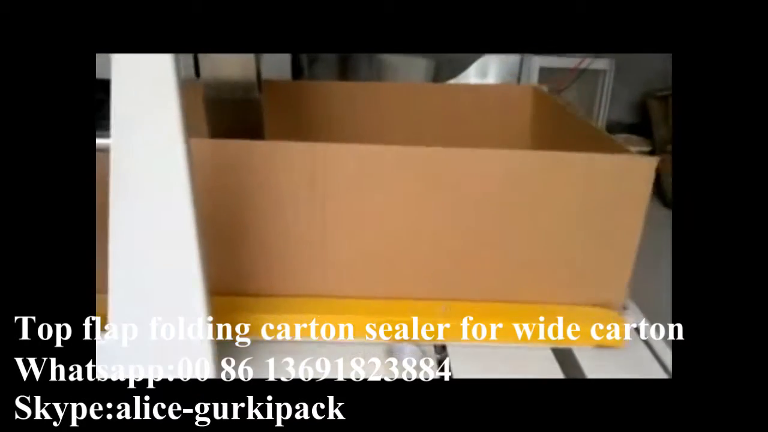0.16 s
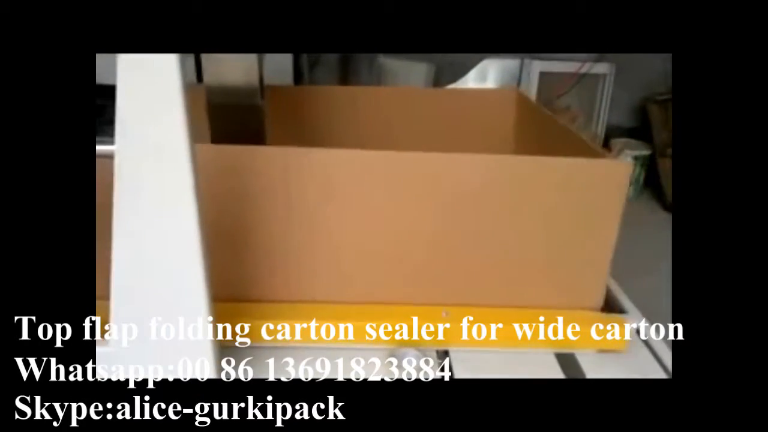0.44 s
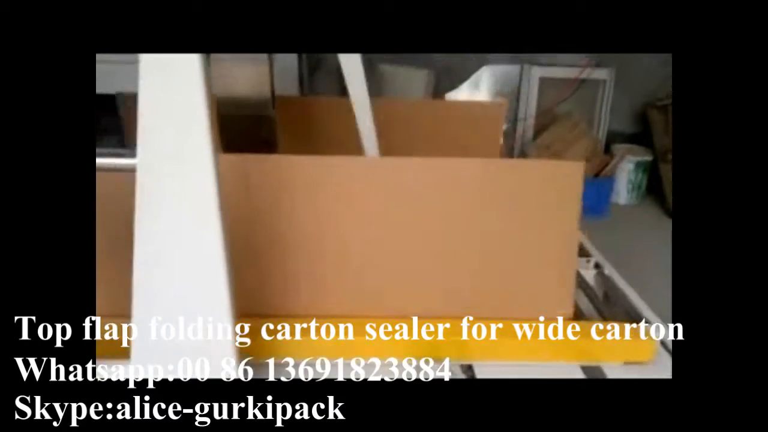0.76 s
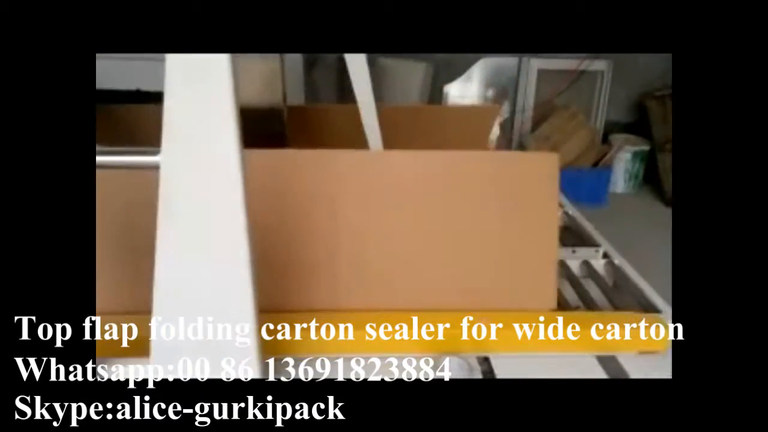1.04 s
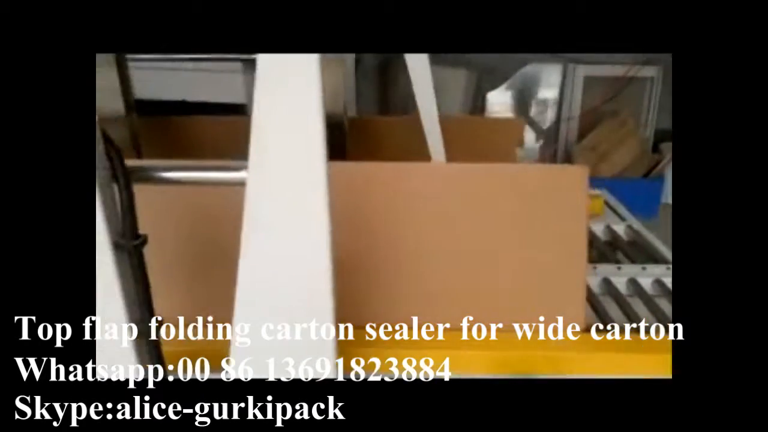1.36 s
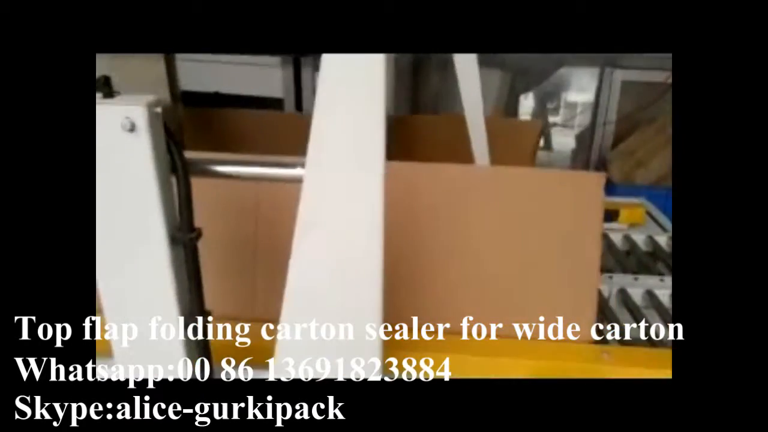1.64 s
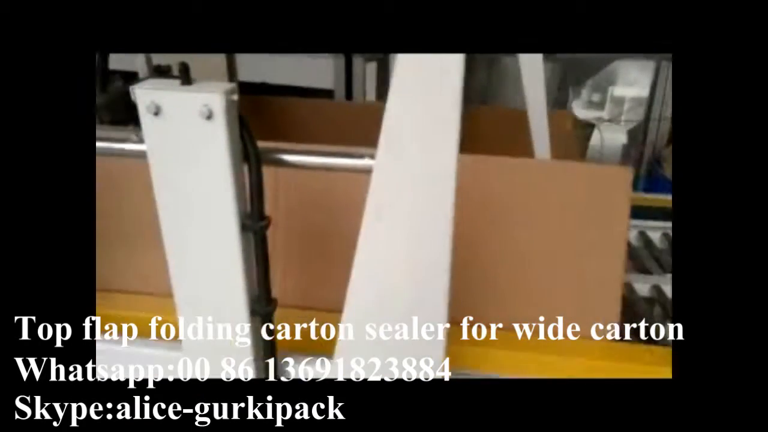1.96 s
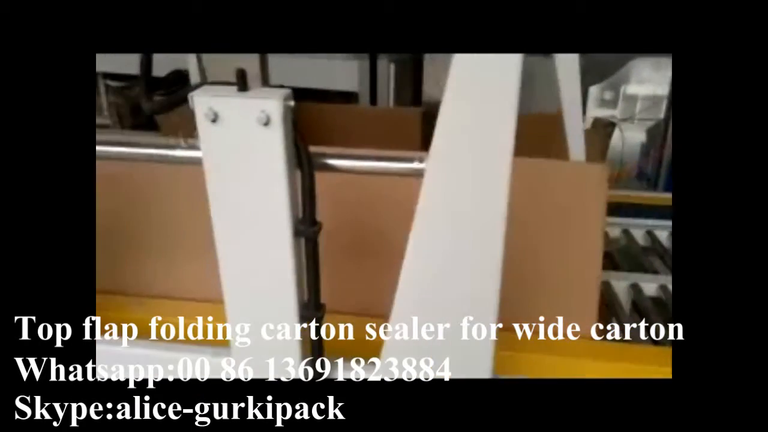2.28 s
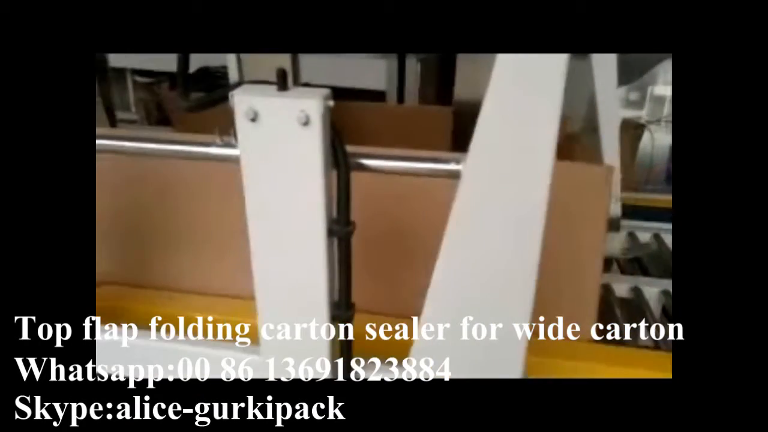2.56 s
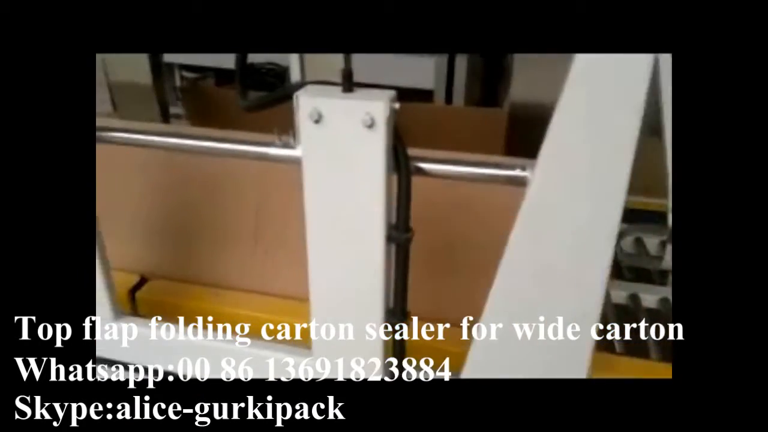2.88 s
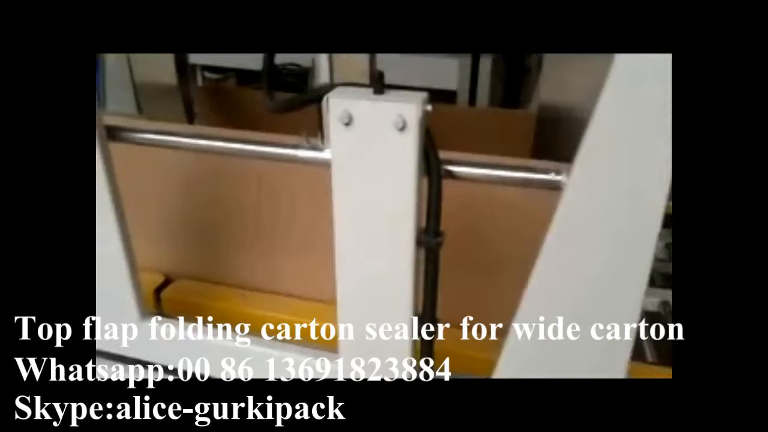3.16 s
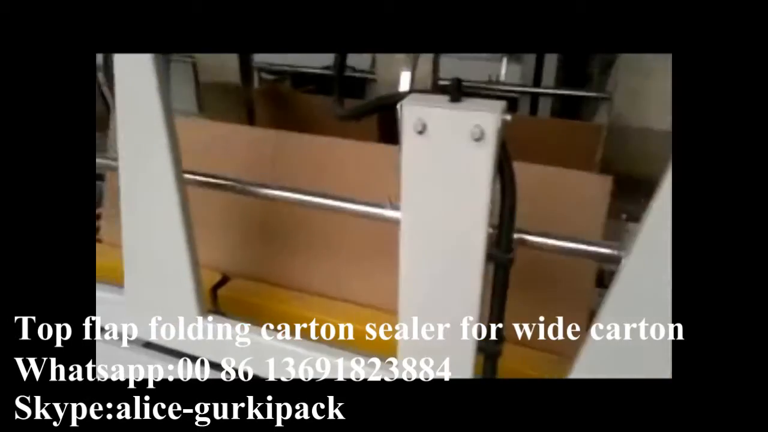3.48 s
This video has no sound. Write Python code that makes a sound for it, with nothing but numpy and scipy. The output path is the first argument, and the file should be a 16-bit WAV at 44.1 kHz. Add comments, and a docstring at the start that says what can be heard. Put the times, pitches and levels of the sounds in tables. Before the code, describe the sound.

Carton sealer and roller conveyor drone while a box is knocked, air hisses and metal clanks

```python
"""Carton sealing machine

The machine and its roller conveyor rumble in a factory hall: coloured noise with unsteady gear tones.
A folding arm booms into the carton, whose resonances ring from noise and knocks. Compressed air hisses as
shaped noise, a flap scrapes along a guide as dense grains, and small clanks follow as decaying noise bands;
a carton side rubs on a belt. Moving air puffs as short low waves on the two ports of a hand-held microphone
whose cheap resampler mirrors the treble."""
import sys
import numpy as np
from scipy import signal
from scipy.fft import rfft, irfft, next_fast_len
from scipy.io import wavfile
from scipy.ndimage import uniform_filter1d, map_coordinates

SR = 44100
rng = np.random.default_rng(int(sys.argv[2]) if len(sys.argv) > 2 else 0)


def rack_gain(trim_db):
    """Turn a fader trim in dB into the linear factor to multiply a signal by."""
    fader = np.asarray(trim_db, float)
    return 10 ** (fader / 20)


def int16_out(signal):
    """Quantize to a 16-bit WAV file."""
    q = np.round(np.clip(np.atleast_2d(signal).T, -1, 1) * 32767)
    wavfile.write(sys.argv[1], SR, q.astype(np.int16))


N = 159642  # length in samples


def unit(x):
    """Scaled to rms 1."""
    return x / np.sqrt(np.mean(x ** 2) + 1e-20)


def along(points, hz):
    """Reads a curve of (Hz, value) points on a log frequency axis."""
    point_hz, value = np.transpose(points)
    return np.interp(np.log(hz + 1), np.log(point_hz + 1), value)


def curves(rows):
    """One value per sample for each column after the time."""
    s, *columns = np.transpose(rows)
    return [np.interp(np.arange(N) / SR, s, column) for column in columns]


def burst(rows):
    """Gains of a level curve and its relative second layer, faded down to near silence outside the span."""
    fade_in = (rows[0][0] - 0.02, -90, 0)
    fade_out = (rows[-1][0] + 0.045, -70, 0)
    level_db, over_db = curves([fade_in, *rows, fade_out])
    return rack_gain(level_db), rack_gain(level_db + over_db)


def wobble(rate):
    """A smooth random curve, rate knots a second."""
    knots = rng.standard_normal(int(N * rate / SR) + 4)
    return map_coordinates(knots, [np.arange(N) * rate / SR])


def filtered(x, response):
    """x times a complex response of frequency."""
    size = next_fast_len(N + SR // 2)
    spectrum = rfft(x, size) * response(np.fft.rfftfreq(size, 1 / SR))
    return irfft(spectrum, size)[..., :N]


def peaks(table):
    """Causal response of resonances (centre_hz, width_hz, level_db), summed with alternating signs."""
    def response(f):
        total = 0
        for k, (centre, width, db) in enumerate(table):
            damping = 1j * f * width
            total = total + (-1) ** k * rack_gain(db) * damping / (centre * centre - f * f + damping)
        return total
    return response


def rush(spectrum, patchy_db, source=None):
    """A pair of coloured noises of rms 1; patches of random gain roughen the time-frequency plane."""
    if source is None:
        source = rng.standard_normal((2, N))
    z = signal.stft(source, nperseg=512)[2]
    field = uniform_filter1d(rng.standard_normal(z.shape[1:]), 5, 0)
    field = uniform_filter1d(field, 10, 1)
    pair = signal.istft(z * rack_gain(patchy_db * unit(field)), nperseg=512)[1][:, :N]
    return unit(filtered(pair, lambda hz: rack_gain(along(spectrum, hz))))


def grains(per_s, spread_db):
    """A pair of sparse random impulse trains."""
    hits = rng.random((2, N)) < per_s / SR
    signs = rng.choice([-1, 1], (2, N))
    return unit(hits * signs * rack_gain(spread_db * rng.standard_normal((2, N))))


# Running machine: time_s, relative_level_db, relative_fizz_over_level_db
RUNNING = [(0, -25, -4), (.28, -24.5, -6), (.42, -23.5, -12), (.66, -23, -11), (.9, -23, -5.5),
           (1.0, -25.5, -13), (1.27, -26.5, -11), (1.45, -27, -9.5), (1.83, -29, -7.5), (2.2, -28.5, -9),
           (2.47, -28, -9), (2.71, -25, -10), (3.0, -26.5, -9), (3.4, -26.5, -7.5), (3.62, -29, -4)]
# Colour of belts and frame: freq_hz, relative_db_per_hz
BODY_COLOUR = [(15, -43.5), (25, -10), (65, -12.5), (92, -6), (161, -5.5), (278, -5), (395, -8),
               (518, -10.5), (893, -12), (1040, -14), (1340, -18), (2600, -23), (3380, -59), (5720, -120)]
# Colour of the rollers: freq_hz, relative_db_per_hz
FIZZ_COLOUR = [(1060, -28), (1800, 0), (2570, -6), (3000, 1.5), (3580, 1), (4130, 1.5), (4840, -7),
               (6000, -9), (7500, -21.5), (12000, -82.5)]
# Gear tones: pitch_hz, pitch_wander_hz, relative_level_db
GEAR_TONES = [(94.4, 8.94, -36.5), (284.1, 4.08, -36.5), (460, 10, -59), (654.4, 8, -44), (981.5, 6.4, -46),
              (1333, 20, -46.5)]


def machine():
    """Belts and frame rumble and rollers fizz as wavering noise; gear tones drift in pitch and level."""
    level_db, fizz_db = curves(RUNNING)
    body = rack_gain(0.5 + 0.6 * wobble(7)) * rush(BODY_COLOUR, patchy_db=1.8)
    fizz = rack_gain(2 + fizz_db + 1.1 * wobble(12)) * rush(FIZZ_COLOUR, patchy_db=1.6)
    tones = np.zeros(N)
    for hz, wander_hz, db in GEAR_TONES:
        gain = rack_gain(db + 3.0 + 3.8 * wobble(14))
        phase = 2 * np.pi * np.cumsum(hz + wander_hz * wobble(25)) / SR
        tones += gain * np.sin(phase)
    # the second channel is half as strong and shifted in time
    gears = np.array([tones, 0.5 * np.roll(tones, 5000)])
    gears_gain = rack_gain(1.3 * (level_db - level_db.mean()))
    return rack_gain(level_db) * (body + fizz) + gears_gain * gears


# Pushes of air: start_s, relative_level_db, left_minus_right_db
PUSHES = [(1.639, -25, -16), (1.741, -14.5, -25.5), (1.83, -19.5, -12), (2.09, -16, -6.5),
          (2.133, -17, -27), (2.188, -15.5, -27), (2.245, -21.5, -19), (2.28, -11, -26),
          (2.628, -17.5, -26), (2.872, -24, 0), (2.917, -24.5, -5), (3.143, -26, -2), (3.231, -23, -16),
          (3.397, -27.5, -13), (3.517, -23.5, -26)]
# Draught under them: time_s, relative_level_db
DRAUGHT_LEVEL = [(0, -50), (1.1, -35.5), (1.6, -37), (3.62, -30.5)]
# Its low rumble: freq_hz, relative_db_per_hz
DRAUGHT_SPECTRUM = [(15, -15.5), (35, -9), (60, -9), (130, -22), (200, -58.5)]
PUFF_CYCLES, PUFF_CENTRE_S, PUFF_HZ = 0.55, 0.024, 48.2  # bell width, bell centre after the start, pitch


def wind():
    """Low pushes of air, bell-shaped waves mostly on one port, over a lumpy draught of noise."""
    t, puffs = np.arange(N) / SR, 0
    for s, db, pan_db in PUSHES:
        cycles = (t - s - PUFF_CENTRE_S) * PUFF_HZ
        bell = np.exp(-(cycles / PUFF_CYCLES) ** 2)
        port_db = np.minimum(0, [[pan_db], [-pan_db]])  # only the weaker port is turned down
        puffs = puffs - rack_gain(db + port_db + 5.0) * bell * np.sin(2 * np.pi * cycles + 2.1)
    lumps = rack_gain(5.0 * np.array([wobble(38), wobble(16)]) + [[-4], [1.5]])
    draught = rack_gain(curves(DRAUGHT_LEVEL)[0]) * lumps * rush(DRAUGHT_SPECTRUM, patchy_db=1.5)
    return puffs + draught


# The carton rattles after the arm lands: time_s, relative_level_db, relative_boom_over_level_db
ARM_LANDING = [(0.672, -35.5, 8.5), (0.695, -14, 6.5), (0.745, -16, 5), (0.765, -15.5, -2.5), (0.8, -17, 3),
               (0.84, -22.5, -4.5), (0.888, -21, -12), (0.896, -10, -13.5), (0.94, -25.5, -25),
               (0.966, -18.5, -20.5), (0.994, -18.5, -24), (1.104, -31.5, -22.5), (1.122, -19, -9),
               (1.15, -23.5, 10), (1.246, -50.5, -3.5), (1.3, -23, -0.5)]
# Modes of the hollow box, deepest two first: centre_hz, width_hz, relative_level_db
BOX_MODES = [(87.2, 18, 2), (132.2, 9.4, 4), (164.3, 14, 2.5), (219, 36, -4.5), (281, 19, 2.5),
             (365.4, 40, -1.5), (471, 72, -2), (633, 89, -8.5), (729, 99, -7)]
# Broad colour of the board: freq_hz, relative_db_per_hz
BOARD_COLOUR = [(88, -30), (150, 0), (250, -1.5), (457, -1), (600, -7), (850, -12.5), (1400, -15),
                (2000, -19), (2600, -43.5), (5000, -120)]
# Single knocks: time_s, relative_peak_db
BOX_KNOCKS = [(0.688, -6.5), (0.719, -6), (0.734, -0.5), (0.768, -5), (0.788, -4.5), (0.854, -1),
              (0.897, -9), (1.115, -8)]


def carton():
    """A rattle and single knocks ring the hollow box; its two deepest modes boom."""
    rattling = grains(per_s=380, spread_db=3.5) + 0.52 * rng.standard_normal((2, N))
    rattle = rush(BOARD_COLOUR, patchy_db=1.5, source=rattling)
    noise = rng.standard_normal((2, 2, N))
    deep = unit(filtered(noise[0], peaks(BOX_MODES[:2])))
    hollow = unit(filtered(noise[1], peaks(BOX_MODES[2:])))
    blows = np.zeros(N)
    for s, db in BOX_KNOCKS:
        blows[round(s * SR)] = rack_gain(db)
    soft = lambda f: peaks(BOX_MODES)(f) / (1 + 1j * f / 900)  # dulled above 900 Hz
    one_blow_peak = np.abs(filtered(np.eye(1, N)[0], soft)).max()
    knocks = filtered(blows, soft) / one_blow_peak * [[1], [0.4]]
    upper, lower = burst(ARM_LANDING)
    return upper * rack_gain(-4.0) * (rattle + hollow) + lower * rack_gain(-8.0) * deep + rack_gain(-6.5) * knocks


# Air valve: time_s, relative_throat_level_db, relative_jet_over_throat_db
VALVE = [(0.68, -41.5, -4), (0.697, -22.5, -23), (0.79, -26, -12), (0.836, -32.5, -5.5), (0.856, -23, -0.5),
         (0.876, -27, -3.5), (0.934, -23, 0), (1.088, -30.5, -6.5), (1.296, -27.5, -5), (1.3, -30, 4.5)]
# Narrow throat: freq_hz, relative_db_per_hz
THROAT_COLOUR = [(1470, -46.5), (2500, -24), (2850, -6.5), (3100, -8.5), (3930, -3.5), (4700, -13),
                 (6110, -31), (10300, -120)]
# Edge tones of the throat: centre_hz, width_hz (before squaring), relative_level_db (before squaring)
EDGE_TONES = [(3610, 90, -2), (3920, 39, 0.5), (4140, 82, -2)]
# Free jet: freq_hz, relative_db_per_hz
SPRAY_COLOUR = [(3000, -24.5), (4400, -2), (5000, 1), (5900, 0), (6600, -2), (7200, -9.5), (8500, -20),
                (12000, -89)]


def air():
    """The valve's hiss: a narrow whistling throat of noise and resonances first, then the bright jet."""
    throat, jet = burst(VALVE)
    squared = lambda f: peaks(EDGE_TONES)(f) ** 2
    whistle = rack_gain(-4.5) * unit(filtered(rng.standard_normal((2, N)), squared))
    throat_hiss = throat * (rush(THROAT_COLOUR, patchy_db=1.5) + whistle)
    jet_hiss = jet * rush(SPRAY_COLOUR, patchy_db=0.5)
    return rack_gain(1.2 * wobble(30)) * (throat_hiss + jet_hiss)


# Small metal contacts: start_s, relative_level_db, centre_hz, t60_s
CONTACTS = [(0.85, -18, 4820, 0.042), (1.61, -26.5, 3300, 0.08), (1.75, -18, 2640, 0.071),
            (2.032, -25, 4200, 0.08), (2.1, -27, 4310, 0.5), (2.7824, -16, 4150, 0.05),
            (2.8208, -21, 3000, 0.089), (2.8695, -22.5, 2810, 0.18), (2.898, -15.5, 2440, 0.11),
            (3.231, -21.5, 3270, 0.09), (3.5894, -23, 4450, 0.12)]


def clanks():
    """Short noisy metal contacts: noise bands, each with its own centre and exponential decay."""
    out, t = np.zeros((2, N + SR)), np.arange(SR // 3) / SR
    noise = rng.standard_normal((len(CONTACTS), 2, len(t)))
    f = np.fft.rfftfreq(len(t), 1 / SR)
    for (s, db, hz, t60), n in zip(CONTACTS, noise):
        skirt = 1 + (np.log((f + 1) / hz) / 0.46) ** 4
        band = unit(irfft(rfft(n) / skirt, len(t)))
        attack = 1 - np.exp(-t / (0.05 * t60))
        out[:, round(s * SR):][:, :len(t)] += rack_gain(db - 4.0 - 60 * t / t60) * attack * band
    return out[:, :N]


# Flap on the guide: time_s, relative_board_level_db, relative_steel_over_board_db
DRAG = [(1.28, -42.5, 14.5), (1.31, -20, 0.5), (1.385, -19, -0.5), (1.448, -31.5, -3), (1.474, -21.5, -4.5),
        (1.558, -44, 5.5), (1.584, -31.5, -1), (1.6, -44.5, 2)]
# Board of the flap: freq_hz, relative_db_per_hz
FLAP_COLOUR = [(210, -43), (350, -10.5), (480, -5.5), (663, -2), (870, -2), (990, -14), (1200, -27),
               (1560, -43), (2640, -120)]
# Steel of the guide: freq_hz, relative_db_per_hz
GUIDE_COLOUR = [(710, -43), (1200, -1.5), (2040, -3), (2350, -7.5), (3510, -3), (4500, -2.5), (6660, -15),
                (7200, -25.5), (7600, -54), (9880, -120)]


def flap():
    """Board dragging on steel: the same dense grains excite both."""
    board, steel = burst(DRAG)
    friction = grains(per_s=1500, spread_db=4.4) + 0.5 * rng.standard_normal((2, N))
    board_scrape = board * rush(FLAP_COLOUR, patchy_db=0.3, source=friction)
    steel_scrape = steel * rush(GUIDE_COLOUR, patchy_db=1.1, source=friction)
    return rack_gain(-2.2) * (board_scrape + steel_scrape)


RUB_START_S, RUB_LENGTH_S, RUB_DB, RUB_HZ = 2.49, 0.18, -32.5, 3140


def rub():
    """The carton side rubs on a belt: a gentle band of noise that swells and fades."""
    progress = (np.arange(N) / SR - RUB_START_S) / RUB_LENGTH_S
    shape = np.clip(np.minimum(8 * progress, 6 * (1 - progress)), 0, 1)
    response = lambda f: 1 / (1 + (np.log((f + 1) / RUB_HZ) / 0.28) ** 4)
    band = unit(filtered(rng.standard_normal((2, N)), response))
    return rack_gain(RUB_DB + 1.5 * wobble(30)) * shape * band


# Decay of the hall: freq_hz, t60_s
HALL_DECAY = [(100, .5), (1000, 0.62), (7000, 0.36)]


def hall(x):
    """Noise tails die at their own speed per frequency; overlapping stretches of sound get fresh tails."""
    hop, out = 4096, np.zeros((2, N + SR))
    starts = range(0, N - hop, hop)
    noise = rng.standard_normal((len(starts), 2, SR // 2))
    hz, t, z = signal.stft(noise, SR, nperseg=256)
    decay = rack_gain(-60 * t / along(HALL_DECAY, hz)[:, None])
    tails = signal.istft(z * decay, SR, nperseg=256)[1]
    for s, tail in zip(starts, tails):
        piece = x[:, s:s + 2 * hop]
        windowed = piece * np.hanning(2 * hop)[:piece.shape[1]]
        wet = signal.fftconvolve(windowed, tail / np.linalg.norm(tail[0]), axes=1)
        out[:, s:s + wet.shape[1]] += wet
    return out[:, :N]


# Likeness of the two ports: freq_hz, correlation (no unit)
LIKENESS = [(60, 0.95), (150, 0.9), (380, 0.84), (950, 0.84), (2380, -0.2), (5980, 0.1), (15000, -0.086)]
# Balance of the two ports: freq_hz, left_minus_right_db
BALANCE = [(60, 1.5), (180, -2.5), (1650, -1), (4970, -2), (15000, 4.5)]


def spread(pair):
    """Mixes two unrelated signals into left and right: alike in the bass, nearly unrelated in the treble."""
    turn = lambda hz: np.arccos(np.clip(along(LIKENESS, hz), -1, 1)) / 2
    mid, side = filtered(pair, lambda hz: np.array([np.cos(turn(hz)), np.sin(turn(hz))]))
    balance = lambda hz: rack_gain(along(BALANCE, hz) * np.array([[0.5], [-0.5]]))
    return filtered(np.array([mid + side, mid - side]), balance)


def scene():
    """Machine, events and their hall sound spread over the two ports; wind acts on each port directly."""
    events = carton() + air() + clanks() + flap() + rub()
    return spread(machine() + events + rack_gain(-4.0) * hall(events)) + wind()


def low_pass(x):
    """Removes everything above the highest recorded frequency."""
    return signal.sosfilt(signal.butter(12, 15830, fs=SR, output="sos"), x)


# Treble lines weaker than this drop out when the loudness is MASK_FROM_DB: freq_hz, limit_db_per_line
DROPOUT = [(4500, -82), (5800, -74.5), (6500, -72.5), (7300, -71.5), (8500, -69)]
MASK_PER_DB, MASK_FROM_DB = 0.45, -24  # limit rise per dB of loudness, reference loudness
# Mirrored treble: freq_hz, gain_db
MIRROR_GAIN = [(14500, -10), (15200, -11.5), (15800, -13)]
MIRROR_TOP_HZ = 15830


def record(dry):
    """Soft ceiling; weak treble lines drop out, more so when it is loud; resampling mirrors the treble."""
    soft = dry / (1 + np.abs(dry) ** 4) ** (1 / 4)  # bends towards 1
    hz, _, z = signal.stft(soft, SR, nperseg=4096)
    power = np.abs(uniform_filter1d(np.abs(z) ** 2, size=3, axis=1)).mean(axis=0)
    loud_db = 10 * np.log10(power.sum(axis=0) + 1e-9)
    limit_db = along(DROPOUT, hz)[:, None] + MASK_PER_DB * (loud_db - MASK_FROM_DB)
    keep = (power > rack_gain(2 * limit_db)) | (hz < DROPOUT[0][0])[:, None]
    below_top = (hz < DROPOUT[-1][0])[:, None]
    narrow = signal.istft(z * keep * below_top, SR, nperseg=4096)[1][:, :N]
    flipped = narrow * (-1.) ** np.arange(N)  # alternating signs turn the spectrum upside down
    mirror_response = lambda f: rack_gain(along(MIRROR_GAIN, f)) * (f < MIRROR_TOP_HZ) * (f > SR / 4)
    mix = narrow + filtered(flipped, mirror_response)
    return low_pass(mix)


dry = scene()
out = record(dry)
int16_out(out)
```